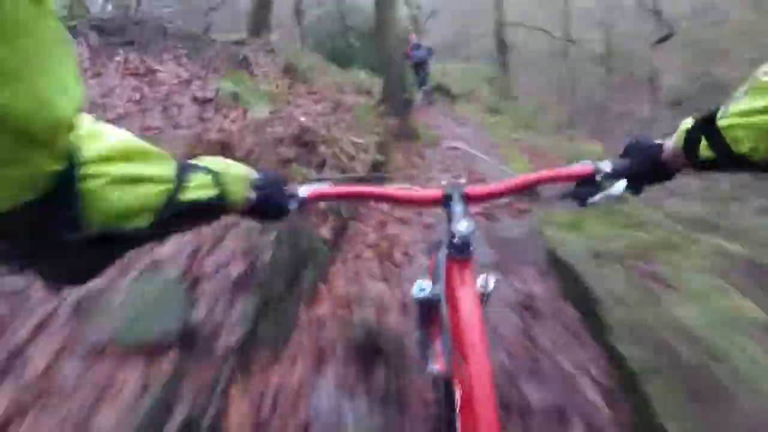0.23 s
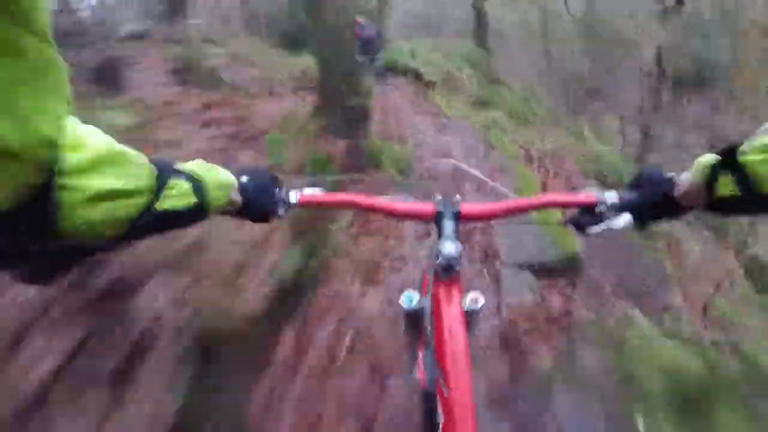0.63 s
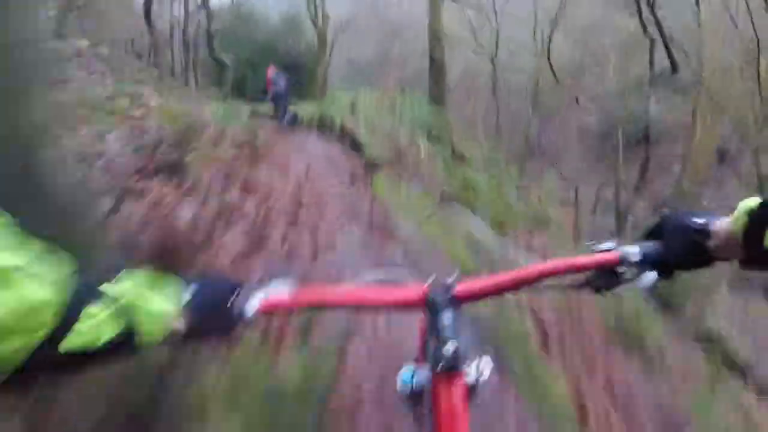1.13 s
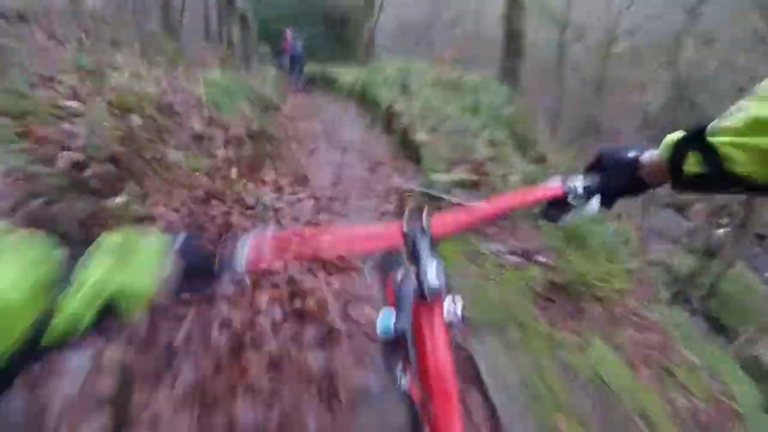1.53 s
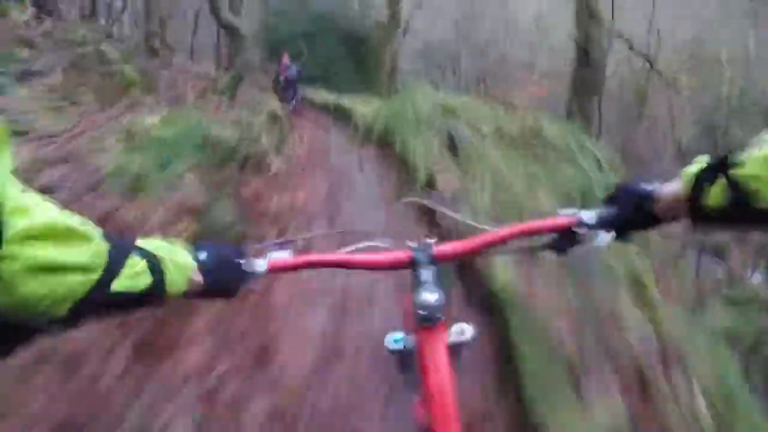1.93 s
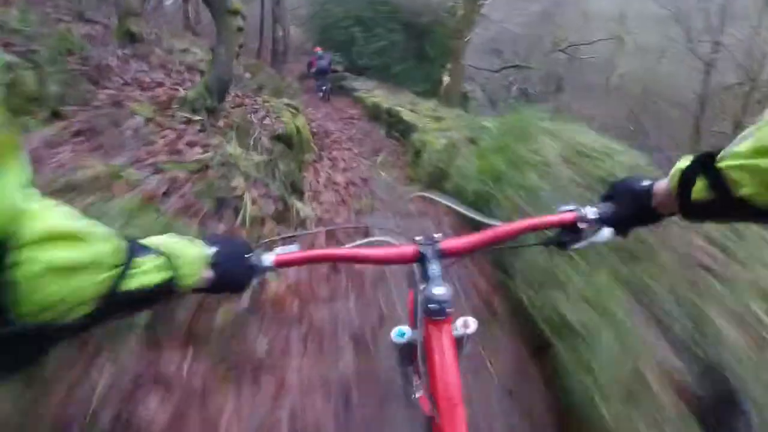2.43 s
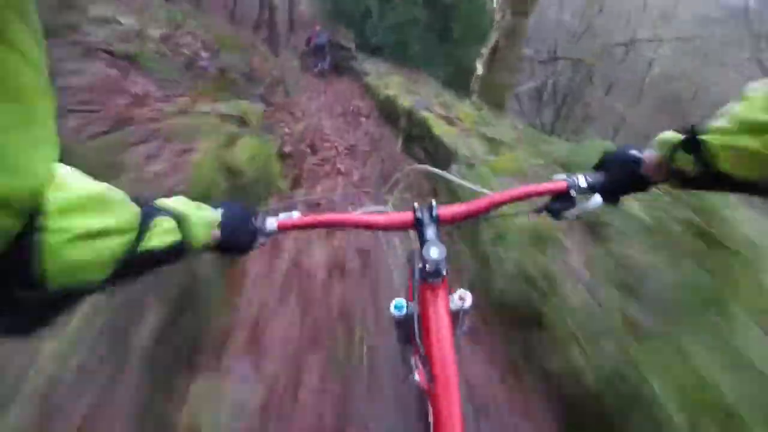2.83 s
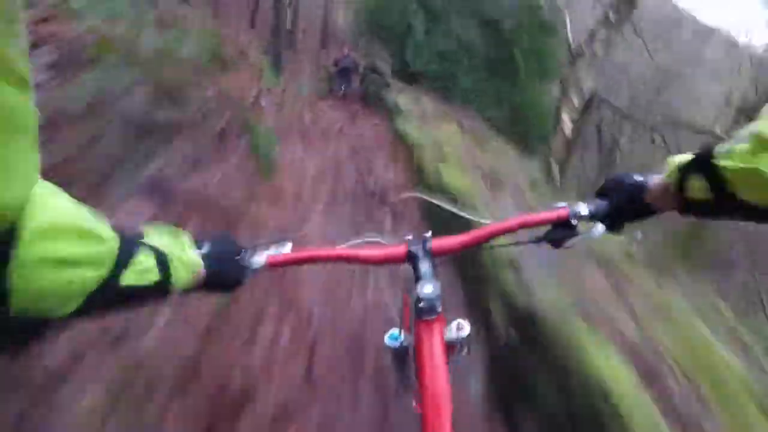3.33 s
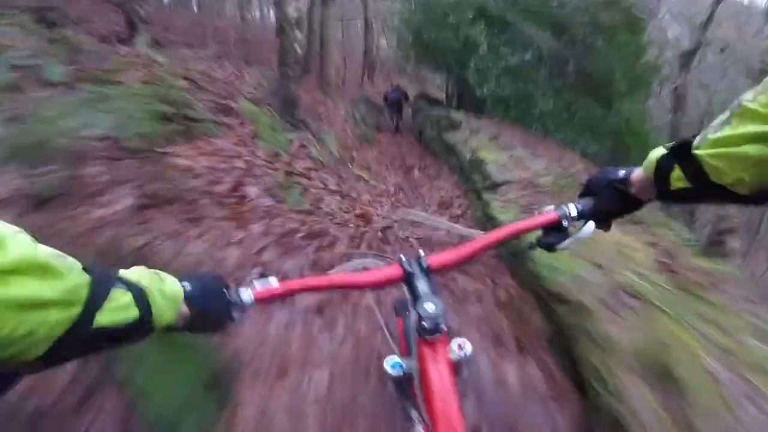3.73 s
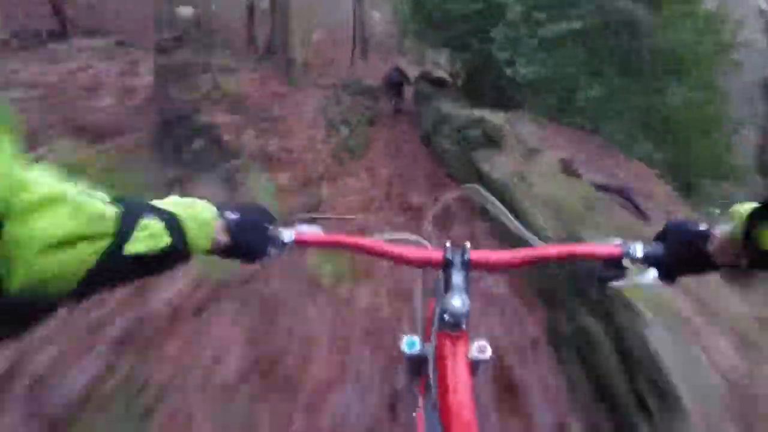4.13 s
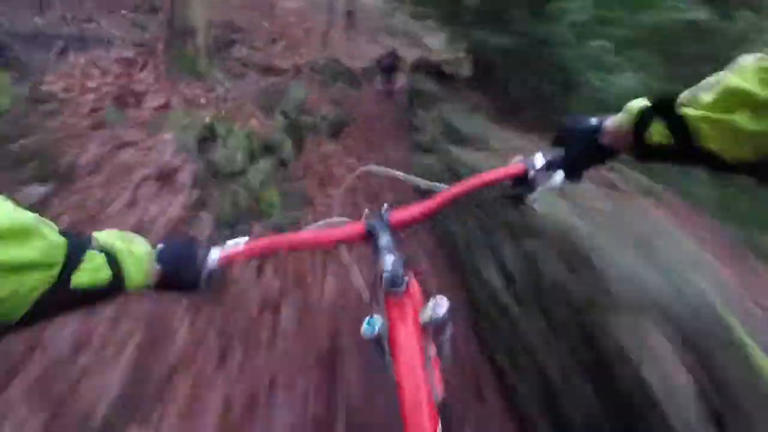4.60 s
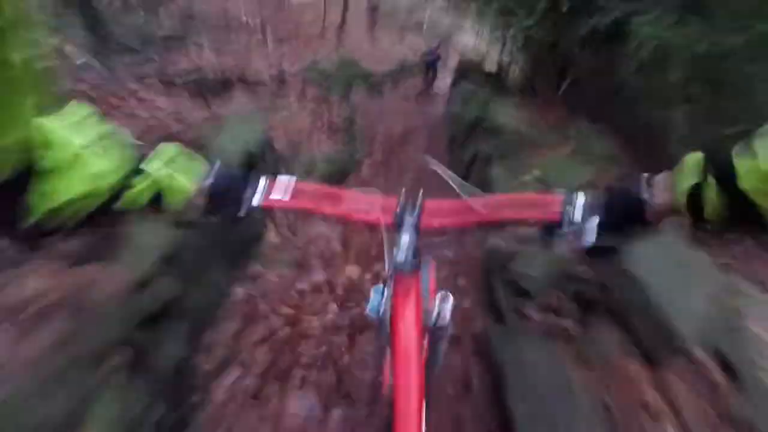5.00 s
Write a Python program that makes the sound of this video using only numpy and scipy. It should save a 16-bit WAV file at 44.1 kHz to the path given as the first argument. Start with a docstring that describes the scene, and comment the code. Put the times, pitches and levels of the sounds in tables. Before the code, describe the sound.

A mountain bike descends a rough, leafy woodland trail for about 5.3 seconds, heard close and dry from a plastic-cased camera on the rider's chest. Tyres drum and grind continuously, trembling over small bumps, with wet leaf crackle, sharp grit ticks, pinging pebbles and uneven chain chatter. Low wind swells under it. Dull air thumps cluster in the first 0.6 seconds, with a stone knock near 0.15. Knocks and chain clacks bunch around 0.7-1.0; 1.1-1.5 is lighter. Slaps return at 1.6-1.9, with a faint disc ring at 1.88. A knock at 2.25 and strong thump at 2.38 lead into dense hollow knocks at 2.6-2.9. More disc rings follow around 3.1-3.9. Tyres surge and growl near 3.6, with the hardest chain slaps at 3.6-3.9. Rumble drops at 3.8, surges with crunch near 4.3, then thuds and thumps crowd 4.7-5.2 as the rumble builds to the end.

```python
"""A mountain bike's tyres rumble, crunch and thud as it coasts fast down a rough, leafy woodland trail.
Tyres, leaves and grit are filtered random impacts; pebbles ping and the knobs growl under load.
The slack chain chatters and slaps, stones knock the hollow frame, and the brake disc rings faintly.
Wind and dull thumps, made of low noise, push on a microphone in a camera on the rider's chest.
The camera's plastic case lends the same few resonances to most of the bright sounds."""
import sys
import numpy as np
from scipy import signal
from scipy.fft import rfft, irfft, next_fast_len
from scipy.io import wavfile
from scipy.ndimage import uniform_filter1d, map_coordinates

SR = 44100
rng = np.random.default_rng(int(sys.argv[2]) if len(sys.argv) > 2 else 0)


def wrap_up_sound(samples):
    """Save the sound to the file named by the first command line argument, as 16-bit audio."""
    columns = np.atleast_2d(samples).T
    # keep every value between -1 and 1, then stretch to whole-number steps
    tamed = np.clip(columns, -1, 1)
    steps = np.round(tamed * 32767).astype(np.int16)
    wavfile.write(sys.argv[1], SR, steps)


N = 231833
TIME = np.arange(N) / SR  # seconds

# In every function, fade_s is the time in which a sound falls by 60 dB.


def amp(db):
    """Turn decibels into a gain."""
    return 10 ** (np.asarray(db) / 20)


def unit(x):
    """Scale x to an rms of 1."""
    return x / np.sqrt(np.mean(x ** 2) + 1e-20)


def level(x, count=128):
    """Rms of the loudest three milliseconds."""
    return np.sqrt(uniform_filter1d(x * x, count).max() + 1e-20)


def shape(points, hz):
    """Gain at each frequency, from (pitch_hz, level_db) points joined on a log axis."""
    point_hz, point_db = np.transpose(points)
    return amp(np.interp(np.log(hz + 1), np.log(point_hz + 1), point_db))


def causal(points, hz):
    """The same gain with minimum phase, so that nothing sounds before a blow."""
    cepstrum = irfft(np.log(shape(points, hz)))
    half = len(cepstrum) // 2
    folded = np.r_[cepstrum[0], 2 * cepstrum[1:half]]
    return np.exp(rfft(folded, len(cepstrum)))


def resonances(modes, hz):
    """Add up ringing modes (pitch_hz, width_hz, level_db), each strongest at its own pitch."""
    total = 0
    for pitch, width, db in modes:
        damping = 1j * hz * width
        total = total + amp(db) * damping / (pitch * pitch - hz * hz + damping)
    return total


def filtered(x, response):
    """Pass x through a filter given as a function of frequency."""
    size = 2 * next_fast_len(len(x) // 2 + 4096)  # spare room for the filter's tail
    hz = np.fft.rfftfreq(size, 1 / SR)
    return irfft(rfft(x, size) * response(hz), size)[:len(x)]


def wobble(rate):
    """A smooth random curve through rate random points a second."""
    points = rng.standard_normal(int(N * rate / SR) + 4)
    return map_coordinates(points, [TIME * rate])


def noise(points):
    """Coloured noise with an rms of 1."""
    return unit(filtered(rng.standard_normal(N), lambda hz: shape(points, hz)))


def grains(rate, spread_db):
    """Tiny impacts of random sizes at random times, about rate a second."""
    hits = rng.random(N) < rate / SR
    sizes = rng.standard_normal(N) * amp(spread_db * rng.standard_normal(N))
    return unit(hits * sizes)


def add(track, s, sound):
    """Mix a sound into the track at time s."""
    room = track[max(round(s * SR), 0):][:len(sound)]
    room += sound[:len(room)]


def curves(rows):
    """One value per sample for each column after the time."""
    s, *columns = np.transpose(rows)
    return [np.interp(TIME, s, column) for column in columns]


def case(hz, through_db=-12):
    """Sound passes the camera case partly straight, partly through its resonances."""
    # ringing of the plastic case: pitch_hz, width_hz, level_db
    case_modes = [(2555, 78, -9), (3010, 190, -15.5), (5360, 570, -1.5), (6480, 176, -1.5),
                  (9200, 1200, -35)]
    return amp(through_db) + resonances(case_modes, hz)


def knobs(swell_db=3, swell_rate=18, wander_rate=14, flutter_rate=260):
    """Knobs folding over rough ground: a broad growl and a hoarse note that swells and wanders."""
    # colour of the broad growl: pitch_hz, level_db (per Hz)
    growl_colour = [(150, -10.5), (300, -4), (500, -10), (900, -10.5), (2000, -17)]
    centre_hz, wander = 420, .25  # wander is a log ratio
    note_db = -1  # against the broad growl
    pitch = centre_hz * np.exp(wander * wobble(wander_rate))
    phase = 2 * np.pi * np.cumsum(pitch) / SR
    # two fluttering waves make the note hoarse
    note = unit(wobble(flutter_rate) * np.sin(phase) + wobble(flutter_rate) * np.cos(phase))
    swell = amp(swell_db * np.tanh(wobble(swell_rate)))
    return unit((noise(growl_colour) + amp(note_db) * note) * swell)


def tyres(rumble_db, dirt_db, rumble_gain_db=-3, dirt_gain_db=-1.5,
          growl_db=-33.0, growl_grows=1.12, grit_db=0.5):
    """Knobbly casings drum and grind, surging over each lump; under load the knobs growl."""
    # colour of the drumming casings: pitch_hz, level_db (per Hz)
    rumble_colour = [(40, -51), (80, -11), (120, -3), (200, -6), (320, -17), (600, -45), (1500, -36),
                     (4000, -87)]
    # colour of the ground-up dirt: pitch_hz, level_db (per Hz)
    dirt_colour = [(120, -7.5), (350, 5.5), (650, -0.5), (1100, -3.5), (2000, -11), (3200, -4.5),
                   (4200, -23), (10000, -44)]
    lumps_db = 2.5  # how far the drumming surges over a lump
    full_load_db = -22  # rumble_db at which the growl stands at growl_db
    lumps = wobble(70)
    drumming = grains(2500, spread_db=0.5) * amp(lumps_db * np.tanh(lumps))
    grinding = grains(700, spread_db=0) * amp(grit_db * lumps)
    rumble = unit(filtered(drumming, lambda hz: causal(rumble_colour, hz)))
    growl = amp(growl_db + growl_grows * (rumble_db - full_load_db)) * knobs()
    dirt = unit(filtered(grinding, lambda hz: causal(dirt_colour, hz)))
    low = amp(rumble_gain_db) * (amp(rumble_db) * rumble + growl)
    return low + amp(dirt_db + dirt_gain_db) * dirt


def leaves(crunch_db, gain_db=-1, clump_db=3):
    """Wet leaves and grit crackle under the tread in clumps."""
    # colour of the crackle: pitch_hz, level_db (per Hz)
    leaf_colour = [(400, -61.5), (1500, 3.5), (2600, 6), (3300, 8), (4100, -6.5), (5000, 0.5), (6500, 7),
                   (7400, 2.5), (9500, 3.5), (12000, -5)]
    crackle = grains(3500, spread_db=0.0) * amp(clump_db * wobble(130))
    crunch = unit(filtered(crackle, lambda hz: causal(leaf_colour, hz) * case(hz)))
    return amp(crunch_db + gain_db) * crunch


def grit(crunch_db, gain_db=-7, rate=55, spread_db=16):
    """Bits of grit flung off the tread tick against the frame, sharp and separate."""
    # colour of the ticks: pitch_hz, level_db (per Hz)
    grit_colour = [(300, -13), (900, 6), (1800, -4), (3000, 1.5), (4100, -24), (5500, -2.5), (9500, -5.5),
                   (12000, 9)]
    fade_s = .02
    hits = (rng.random(N) < rate / SR) * amp(spread_db * rng.random(N))
    fade = amp(-60 * TIME[:SR // 20] / fade_s)
    bursts = signal.fftconvolve(hits, fade)[:N] * rng.standard_normal(N)
    ticks = unit(filtered(bursts, lambda hz: causal(grit_colour, hz) * case(hz)))
    return amp(crunch_db + gain_db) * ticks


def pebbles(dirt_db, spread_db=15, snap_level=0.78, count=260):
    """Small stones and twigs ping and snap under the tread, each at a pitch of its own."""
    gain_db = -4.5  # against dirt_db
    lowest_hz, span = 800, 4  # the highest pitch is span times the lowest
    ping_fade_s, snap_fade_s = .03, .02
    out, t = np.zeros(N), TIME[:SR // 15]
    for when, pitch, size in rng.random((count, 3)):
        ping = np.sin(2 * np.pi * lowest_hz * span ** pitch * t) * amp(-60 * t / ping_fade_s)
        snap = snap_level * rng.standard_normal(len(t)) * amp(-60 * t / snap_fade_s)
        add(out, when * N / SR, amp(spread_db * size) * (ping + snap))
    return amp(dirt_db + gain_db) * unit(filtered(out, lambda hz: case(hz, through_db=-18.5)))


def chatter(crunch_db, gain_db=-6.5, spread_db=3, rate=48, unevenness=.3, attack_s=0.026):
    """The slack chain bounces in its guide, ticking at an uneven rate."""
    # colour of the ticking: pitch_hz, level_db (per Hz)
    chatter_colour = [(400, -32), (1500, 5.5), (2600, 4), (3200, -8), (4100, -5), (5200, -7.5),
                      (6600, -4.5), (7400, 0), (9500, -5.5), (12000, -8)]
    fade_s = .045
    bounces = np.floor(np.cumsum(rate * np.exp(unevenness * wobble(30))) / SR)
    sizes = amp(spread_db * np.clip(rng.standard_normal(N), -2, 2))
    ticks = np.diff(bounces, prepend=0) * sizes  # a tick each time the count goes up
    t = TIME[:SR // 8]
    envelope = amp(-60 * t / fade_s) * (1 - np.exp(-t / attack_s))
    bursts = signal.fftconvolve(ticks, envelope)[:N] * rng.standard_normal(N)
    rattle = unit(filtered(bursts, lambda hz: causal(chatter_colour, hz) * case(hz)))
    return amp(crunch_db + gain_db) * rattle


def wind(buffet_db, gain_db=-3, eddies_db=1.5, eddy_rate=10):
    """Eddies push on the microphone port, swelling and slackening many times a second."""
    # colour of the buffeting: pitch_hz, level_db (per Hz)
    buffet_colour = [(10, -7), (22, -9), (45, 0), (80, -3), (120, -9.5), (200, -36), (500, -43),
                     (1500, -100)]
    return amp(buffet_db + gain_db + eddies_db * wobble(eddy_rate)) * noise(buffet_colour)


def thumps(gain_db=-5.5, lead_s=0.001):
    """A jolt or gust throws a dull push of air at the microphone; deeper ones last longer."""
    # the thumps: crest_s (before lead_s), level_db (before gain_db), pitch_hz
    thump_list = [(0.073, -19, 97.2), (0.152, -17, 151), (0.236, -10, 103.3), (0.268, -16.5, 73.2),
                  (0.362, -9.5, 78.4), (0.477, -11, 116.7), (0.51, -14, 109.5), (0.598, -15.5, 137.7),
                  (0.826, -19.5, 85.4), (0.916, -19.5, 56.8), (0.944, -17.5, 138.4), (1.529, -14, 87.4),
                  (1.567, -16.5, 99.2), (1.683, -22, 75.5), (2.249, -20.5, 96), (2.361, -18, 149.3),
                  (2.378, -9.5, 105.7), (2.56, -18, 111), (2.595, -13, 136), (2.657, -15.5, 75.3),
                  (2.724, -18.5, 90), (3.01, -16, 54.1), (3.505, -19.5, 64), (3.613, -15.5, 94.3),
                  (3.766, -18.5, 80), (3.994, -15, 78), (4.109, -23, 70.6), (4.638, -14.5, 130),
                  (4.702, -11, 108.5), (4.73, -20, 74), (4.781, -16, 74.6), (4.837, -15.5, 110),
                  (4.878, -17, 145), (4.917, -18, 110.7), (5.033, -13.5, 124), (5.217, -14.5, 82.5)]
    # colour of a thump pitched at colour_hz: pitch_hz, level_db (per Hz)
    thump_colour = [(20, -16), (70, 2), (120, 7), (230, -6), (400, -22), (800, -35), (2500, -100)]
    colour_hz = 120
    swell_cycles = 1.5  # width of the swell, in the thump's own cycles
    out, t = np.zeros(N), TIME[:SR // 5]
    for s, db, pitch in thump_list:
        swell_s = swell_cycles / pitch
        air = filtered(rng.standard_normal(len(t)),
                       lambda hz: shape(thump_colour, hz * colour_hz / pitch))
        # even out the noise so that the swell alone sets the loudness
        power = np.abs(uniform_filter1d(air * air, int(2 * SR / pitch)))
        even_air = air / np.sqrt(power + 1e-20)
        swell = np.exp(-(t / swell_s - 2) ** 2 / 2) * np.minimum(t / swell_s, 1)
        add(out, s - 2 * swell_s - lead_s, amp(db + gain_db) * even_air * swell)
    return out


def slaps(gain_db=-8, tick_gain_db=9, volley_level=0.44, first_contact=5, detune=0.016):
    """Links land in a volley: a dry tick and ringing steel at once; hard slaps also wake a sprocket."""
    # chain slaps: start_s, level_db (before gain_db), tick_db (against the ring, before tick_gain_db),
    # low_db (added to the lowest steel mode)
    slap_list = [(0.124, -16, 3, 22), (0.385, -20, 1, -13), (0.48, -20, -6, 2), (0.523, -18.5, 1, -4),
                 (0.667, -17, -7, 7), (0.826, -14, 21, -4), (0.863, -16, -2, -10), (0.937, -12, 8, -3),
                 (0.948, -13, -7, 15), (0.975, -15, -3, 10), (1.008, -13, -22, 9), (1.018, -19, -16, 10),
                 (1.027, -14, -12, 10), (1.326, -23.5, 7, 7), (1.607, -19, -12, 2), (1.616, -9, -5, -6),
                 (1.666, -12, 11, -9), (1.686, -17.5, 0, 0), (1.736, -7, -7, -3), (1.876, -8.5, -3, -4),
                 (1.937, -16.5, 24, -1), (2.256, -16, 5, 9), (2.506, -15, -7, -7), (2.654, -15, 0, 3),
                 (2.695, -18.5, 2, 0), (2.784, -10.5, -6, 4), (2.817, -15, -1, -2), (2.838, -13.5, 12, 0),
                 (2.872, -16.5, -7, -1), (2.943, -15, -7, -11), (3.002, -14, 3, -4), (3.068, -18.5, 1, 2),
                 (3.122, -13.5, 10, 3), (3.22, -11.5, 1, 6), (3.626, -9, -15, 4), (3.701, -5, -22.5, 1),
                 (3.796, -6.5, -13, 6), (3.876, -3.5, -14, -15), (3.96, -19, 10, -5), (4.246, -20, -12, 5),
                 (4.294, -19, -27, -10), (4.388, -8.5, -29, 3), (4.45, -16, -6, -1), (4.583, -11, -16, -16),
                 (4.744, -18.5, 0, -3), (4.914, -16.5, 10, -1), (5.15, -18, -8, 6), (5.226, -8, -27, -3),
                 (5.235, -12, -7, -3)]
    # ringing of the chain's steel: pitch_hz, width_hz, level_db
    chain_modes = [(5550, 154, 2), (6567, 230, 4), (7580, 200, -18)]
    # a sprocket's clear ring at a slap of 0 dB: pitch_hz, width_hz, level_db
    sprocket = (6130, 55, 12.5)
    # colour of the dry tick: pitch_hz, level_db (per Hz)
    link_colour = [(300, -23), (1500, -1.5), (3000, 5), (4100, -4), (5200, -1.5), (7000, 5), (9500, 6.5),
                   (12000, 3)]
    volley_s, fade_s = 0.0026, 0.056  # how long the links take to land, and to die away
    rise_s = .00009  # at a slap of 0 dB; softer slaps rise more slowly
    out, t = np.zeros(N), TIME[:SR // 6]
    envelope = amp(-60 * np.maximum(t - volley_s, 0) / fade_s) + volley_level * (t < volley_s)
    for s, db, tick_db, low_db in slap_list:
        force = amp(db)
        tension = 1 + detune * rng.standard_normal()
        volley = rng.standard_normal(len(t)) * envelope * (1 - np.exp(-t * force / rise_s))
        volley[0] += first_contact * force
        modes = [(hz * tension, width, mode_db + low_db * (k == 0))
                 for k, (hz, width, mode_db) in enumerate(chain_modes)]
        tick = filtered(volley, lambda hz: causal(link_colour, hz) * case(hz))
        steel = filtered(volley, lambda hz: resonances(modes, hz) - force * resonances([sprocket], hz))
        clack = steel / level(steel) + amp(tick_db + tick_gain_db) * tick / level(tick)
        add(out, s, amp(db + gain_db) * clack / level(clack))
    return out


def knocks(gain_db=-6, crack_level=0.91, body_gain_db=0, scatter_db=3, push=18, clack_db=-3):
    """A stone hits a wheel: a crack and scrape, the stone's own clack, and the hollow frame's answer."""
    # stone hits: start_s, level_db (before gain_db), body_db (hollow body against the crack),
    # pitch_hz (of the stone's clack)
    knock_list = [(0.146, -11, -7.5, 430), (0.158, -18, -5, 1100), (0.693, -20, 5, 1300),
                  (0.706, -11.5, -3, 500), (0.779, -25, 2, 1410), (0.939, -14, -5, 830),
                  (0.947, -10.5, -10, 410), (0.976, -10, 0, 910), (1, -10.5, -2, 505),
                  (1.01, -15.5, 2, 630), (1.172, -31, 2, 790), (1.324, -32, -7, 1300),
                  (1.607, -19, -2, 1130), (1.617, -20, 4, 474), (1.632, -17, -5, 690),
                  (1.685, -16, -14, 547), (2.247, -9.5, -5.5, 694), (2.489, -25, 5, 965),
                  (2.612, -18, -12, 704), (2.695, -16.5, 7, 1400), (2.744, -19, 9, 950),
                  (2.784, -11.5, -6, 1200), (2.809, -10, 7, 1100), (2.839, -13, -2, 810),
                  (2.86, -10.5, 0, 1240), (3.031, -19.5, 8, 900), (3.148, -14.5, -4, 970),
                  (3.621, -14, -3, 1050), (3.941, -15, 2, 1035), (4.049, -18, -18, 1200),
                  (4.268, -16, 4, 690), (4.28, -17, 0, 696), (4.341, -17.5, 2, 620), (4.361, -18, -6, 1290),
                  (4.475, -20.5, -1, 1100), (4.505, -18, -10, 910), (4.655, -22, -6, 600),
                  (4.916, -15.5, 22, 695)]
    # ringing of frame and wheel: pitch_hz, width_hz, level_db
    body_modes = [(430, 340, 29), (630, 160, 24.5), (767, 92, 21.5), (1100, 250, 19), (1257, 280, 15.5),
                  (1570, 87, 16)]
    # colour of the crack: pitch_hz, level_db (per Hz)
    crack_colour = [(80, -38), (250, 16.5), (800, -4.5), (1400, -15), (2600, 6), (3500, 4), (4100, -13),
                    (6000, -7.5), (9500, -10.5), (12000, 4.5)]
    # the tyre softens a blow before it reaches the frame: pitch_hz, level_db
    cushion = [(1500, 0), (2500, -6), (6000, -22)]
    crack_fade_s, scrape_fade_s, body_fade_s, clack_fade_s = .015, 0.079, 0.066, .04
    favour_db = 5  # modes lose this much per octave away from the stone's pitch
    out, t = np.zeros(N), TIME[:SR // 6]
    scrape = amp(-60 * t / scrape_fade_s) + crack_level * amp(-60 * t / crack_fade_s)
    for s, db, body_db, pitch in knock_list:
        crack_blow = rng.standard_normal(len(t)) * scrape
        body_blow = rng.standard_normal(len(t)) * amp(-60 * t / body_fade_s)
        body_blow[0] += push  # the first contact pushes all the modes at once
        modes = [(hz, width, mode_db - favour_db * abs(np.log2(hz / pitch)) + rng.normal(0, scatter_db))
                 for hz, width, mode_db in body_modes]
        crack = filtered(crack_blow, lambda hz: causal(crack_colour, hz) * case(hz))
        hollow = filtered(body_blow, lambda hz: resonances(modes, hz) * causal(cushion, hz))
        clack = np.sin(2 * np.pi * pitch * t) * amp(-60 * t / clack_fade_s)
        body = hollow / level(hollow) + amp(clack_db) * clack
        knock = crack / level(crack) + amp(body_db + body_gain_db) * body / level(body)
        add(out, s, amp(db + gain_db) * knock / level(knock))
    return out


def thuds(gain_db=-2, scuff_db=-5.0, attack_s=.003):
    """A root squeezes the tyre: the casing gives a short, dull note while rubber scuffs the bark."""
    # thuds over roots: start_s, level_db (before gain_db), pitch_hz (of the casing)
    thud_list = [(0.146, -19, 235), (0.231, -23.5, 350), (0.346, -25, 320), (0.44, -27.5, 520),
                 (0.479, -21, 370), (0.597, -28, 340), (0.654, -24, 400), (0.94, -23, 340),
                 (1.001, -22.5, 400), (1.116, -27, 440), (1.312, -28.5, 260), (1.561, -28, 400),
                 (1.589, -29.5, 450), (1.653, -24.5, 380), (1.667, -31, 320), (1.937, -29, 260),
                 (2.357, -27, 540), (2.375, -23, 300), (2.457, -30.5, 300), (2.561, -26, 310),
                 (2.592, -28.5, 300), (2.694, -26, 260), (2.745, -25.5, 280), (2.809, -22, 240),
                 (3.055, -26.5, 320), (3.148, -21, 250), (3.158, -34, 355), (3.622, -25.5, 420),
                 (4.139, -25.5, 326), (4.341, -27, 580), (4.473, -24.5, 260), (4.705, -25, 445),
                 (4.792, -25, 240), (4.878, -22, 215), (4.919, -20.5, 230), (4.994, -23.5, 300),
                 (5.028, -29, 470), (5.047, -26, 356), (5.204, -22.5, 400)]
    # colour of the scuffing rubber: pitch_hz, level_db (per Hz)
    scuff_colour = [(100, -14), (300, 0), (750, -1), (1100, -14), (2500, -38)]
    casing_fade_s, scuff_fade_s = .045, .045
    out, t = np.zeros(N), TIME[:SR // 8]
    for s, db, pitch in thud_list:
        casing = np.sin(2 * np.pi * pitch * t) * amp(-60 * t / casing_fade_s)
        rubbing = rng.standard_normal(len(t)) * amp(-60 * t / scuff_fade_s)
        scuff = filtered(rubbing, lambda hz: causal(scuff_colour, hz))
        both = casing / level(casing) + amp(scuff_db) * scuff / level(scuff)
        thud = both * (1 - np.exp(-t / attack_s))
        add(out, s, amp(db + gain_db) * thud / level(thud))
    return out


def rotor(rubbing=0.0081):
    """A jolt flicks the brake disc against its pads; it rings faintly, roughened by their rubbing."""
    # hard jolts that set the disc ringing: start_s, level_db
    ring_list = [(1.877, -34), (3.135, -33.5), (3.23, -37), (3.618, -40), (3.862, -37)]
    # the disc's notes: pitch_hz, level_db, fade_s
    disc_modes = [(1696, 0, .22), (2024, -9, .12), (2985, -6, .12)]
    out, t = np.zeros(N), TIME[:SR // 2]
    for s, db in ring_list:
        drift = rubbing * np.cumsum(rng.standard_normal(len(t)))  # the phase strays at random
        ring = np.zeros(len(t))
        for pitch, mode_db, fade_s in disc_modes:
            ring += amp(mode_db - 60 * t / fade_s) * np.sin(2 * np.pi * pitch * t + drift)
        add(out, s, amp(db) * ring)
    return out


def scene(bumps_db=2.5, bump_rate=22):
    """Everything is close and dry; small bumps shake tyres, leaves and chain chatter together."""
    # air speed at the microphone, in long swells: time_s, buffet_db (before wind's gain)
    airflow = [(0, -24.5), (.45, -24.5), (.7, -27), (.9, -24), (1.1, -30), (1.45, -32), (1.8, -24.5),
               (2.08, -32.5), (2.48, -28.5), (2.6, -24.5), (3.05, -23), (3.85, -25), (4.05, -22),
               (4.5, -30), (4.75, -22), (5.26, -27)]
    # how hard the tyres are pressed into the ground: time_s, rumble_db (before bumps and gain)
    load = [(0, -30), (.5, -30), (.66, -32.5), (.95, -32.5), (1.1, -38.5), (1.45, -37.5), (1.62, -37),
            (1.8, -32), (2.05, -35), (2.5, -32.5), (2.58, -27.5), (3, -27.5), (3.42, -31.5), (3.58, -23.5),
            (3.8, -40.5), (4.27, -25), (4.4, -30.5), (4.57, -34), (4.66, -28), (5.26, -23.5)]
    # smooth and rough stretches: time_s, dirt_db, crunch_db (both before bumps and gains)
    ground = [(0.12, -38.5, -35.5), (.28, -42.5, -39), (.72, -39.5, -35.5), (1.02, -39, -36.5),
              (1.2, -41.5, -37), (1.48, -42, -41.5), (1.66, -39.5, -34.5), (2.05, -44.5, -38),
              (2.45, -41.5, -38), (2.8, -37, -39), (3.15, -37.5, -34), (3.45, -43, -36),
              (3.6, -42.5, -34.5), (3.85, -42, -36), (4.12, -43.5, -38), (4.32, -37.5, -32),
              (4.7, -42.5, -38), (5.05, -44, -36), (5.26, -48, -35.5)]
    buffet_db, = curves(airflow)
    bump_db = bumps_db * np.tanh(wobble(bump_rate))
    rumble_db, dirt_db, crunch_db = [db + bump_db for db in curves(load) + curves(ground)]
    rolling = tyres(rumble_db, dirt_db) + leaves(crunch_db) + grit(crunch_db) + pebbles(dirt_db) + thuds()
    rattling = chatter(crunch_db) + slaps() + knocks() + rotor()
    air = wind(buffet_db) + thumps()
    return (air + rolling + rattling)[None]


def record(dry):
    """The top treble falls away steeply above 10 kHz, and nothing is left above top_hz."""
    # fall of the top treble: pitch_hz, level_db
    treble_fall = [(9000, 1), (9900, -5), (10400, -25.5), (13000, -34), (14300, -67)]
    top_hz = 14330
    return filtered(dry[0], lambda hz: shape(treble_fall, hz) * (hz < top_hz))[None]


dry = scene()
out = record(dry)
wrap_up_sound(out)
```